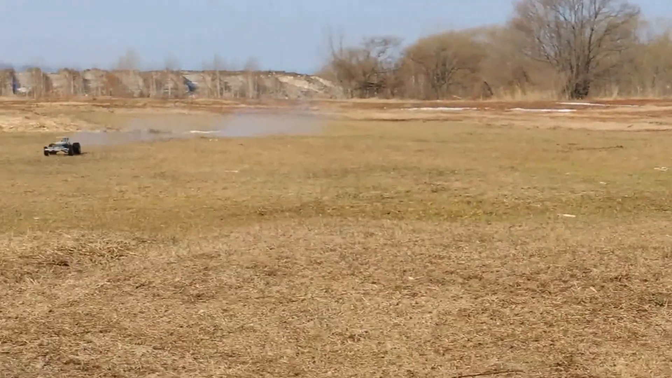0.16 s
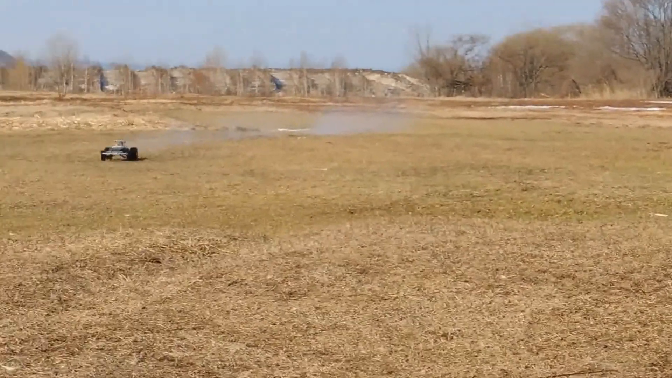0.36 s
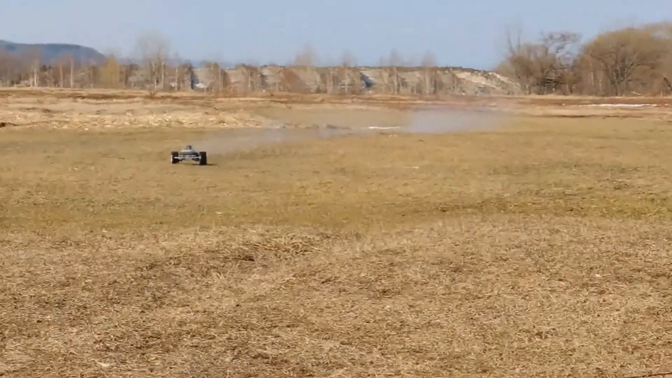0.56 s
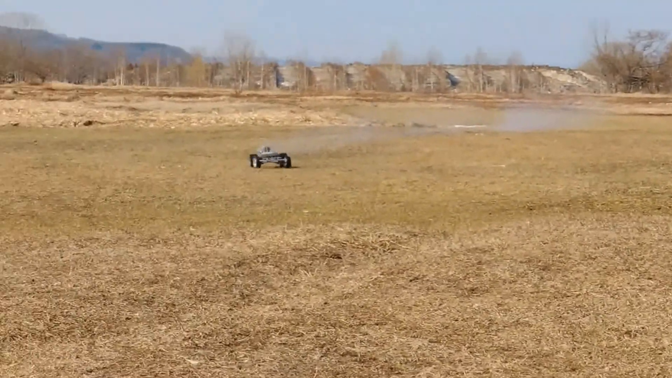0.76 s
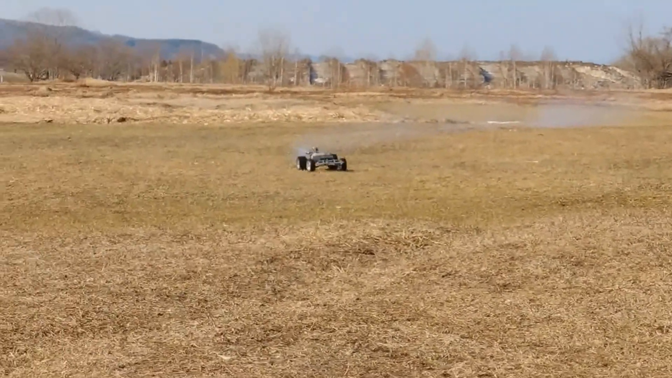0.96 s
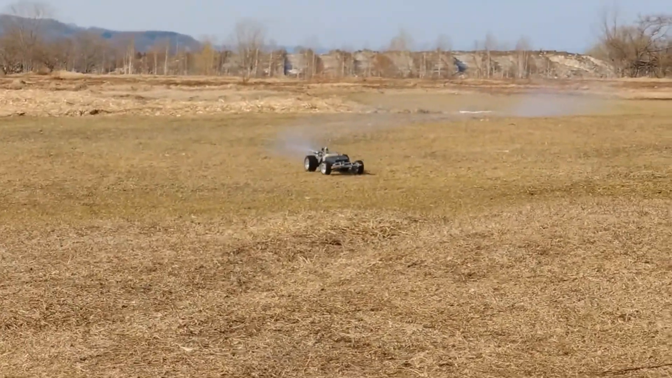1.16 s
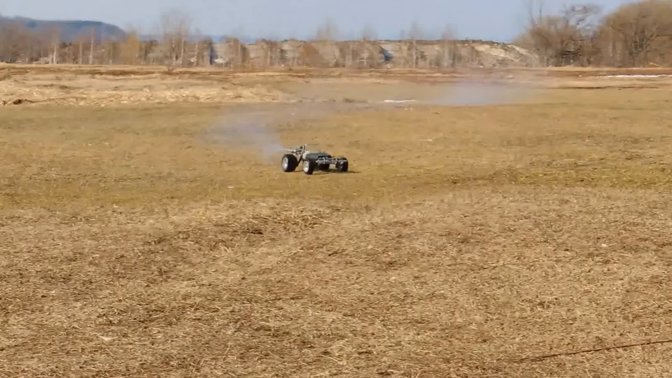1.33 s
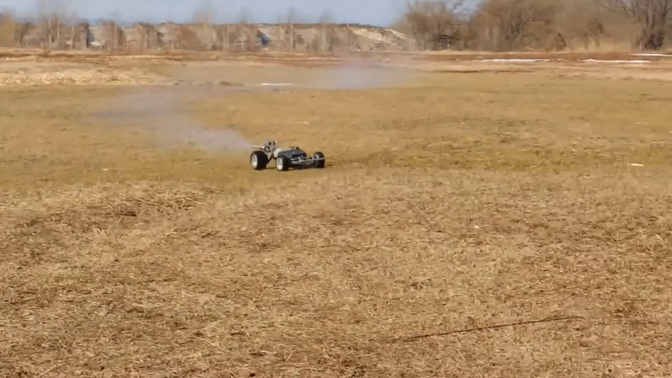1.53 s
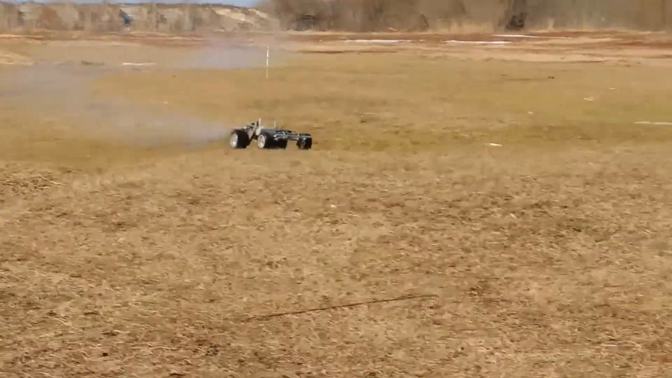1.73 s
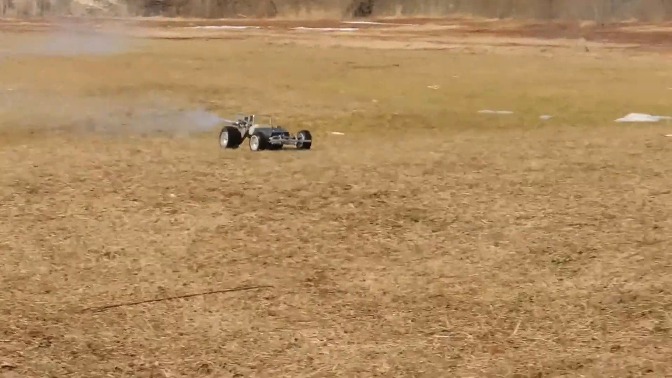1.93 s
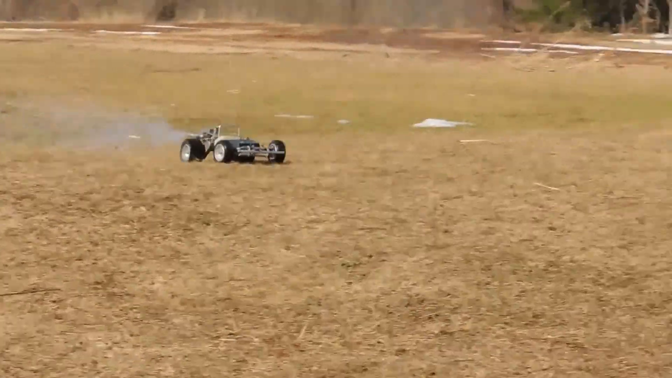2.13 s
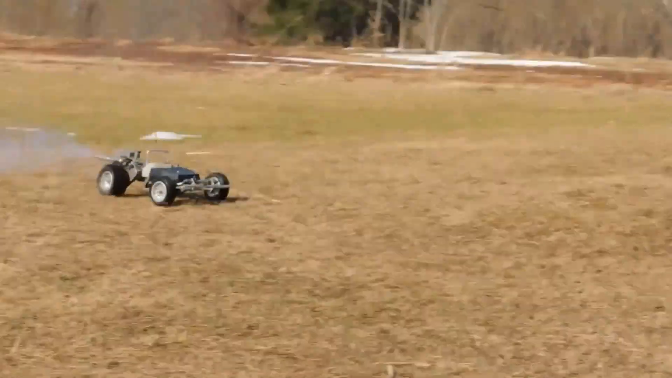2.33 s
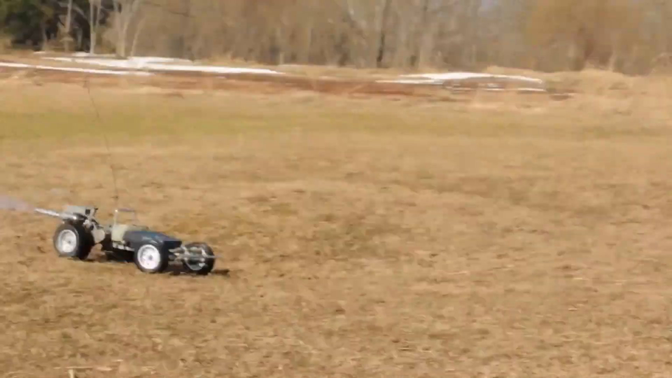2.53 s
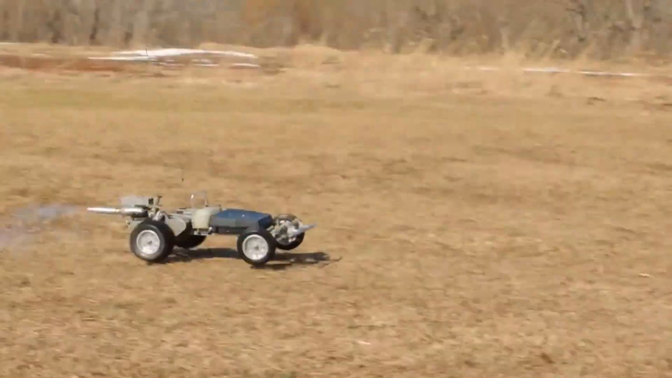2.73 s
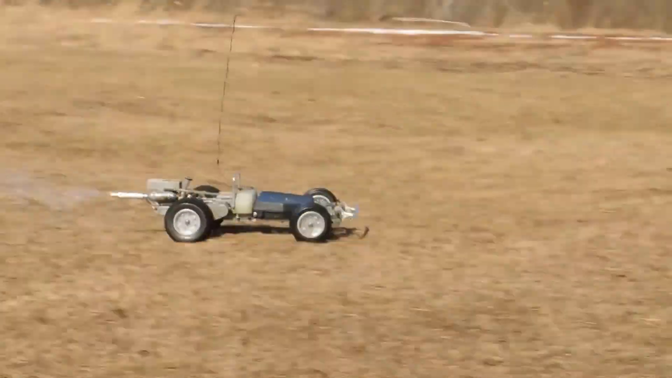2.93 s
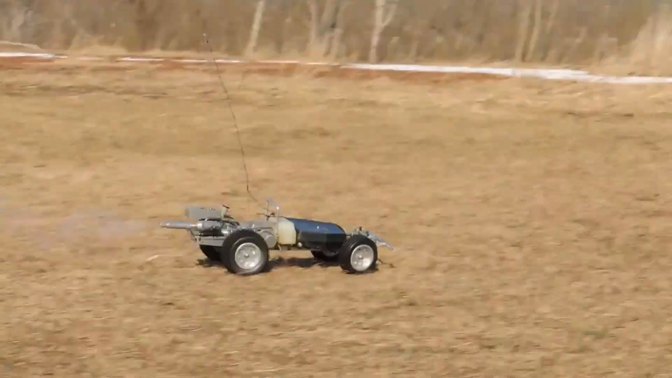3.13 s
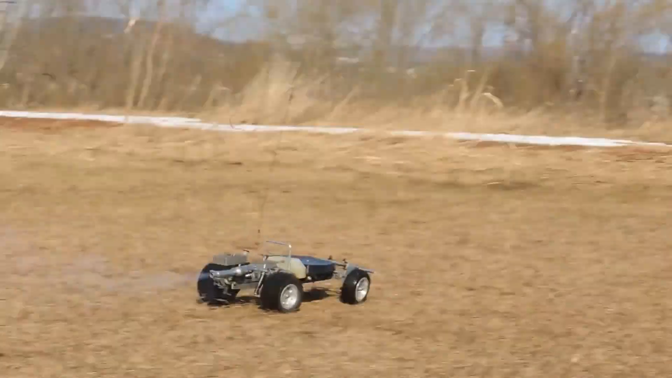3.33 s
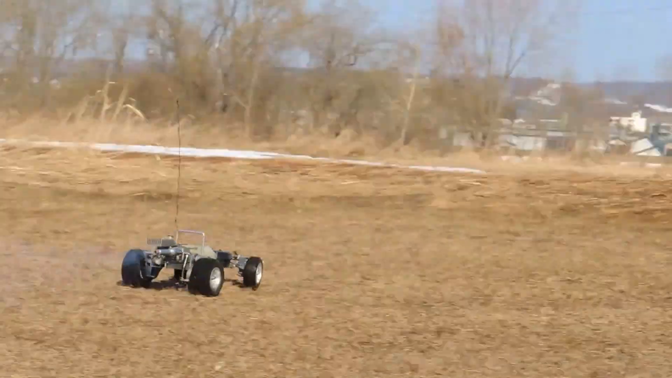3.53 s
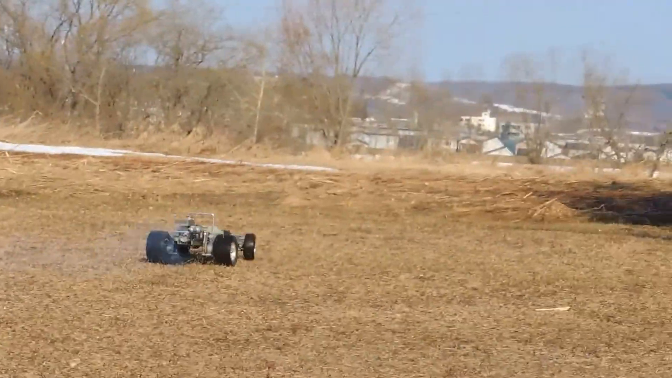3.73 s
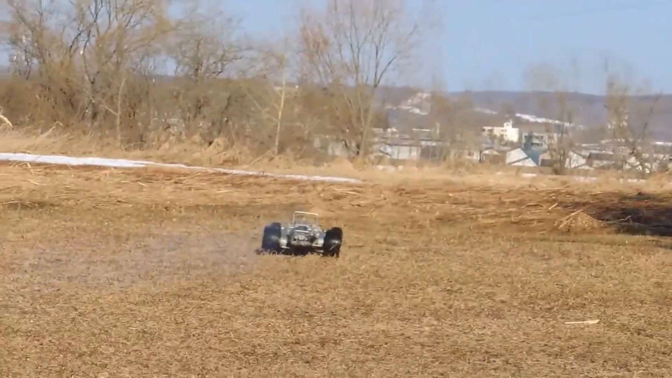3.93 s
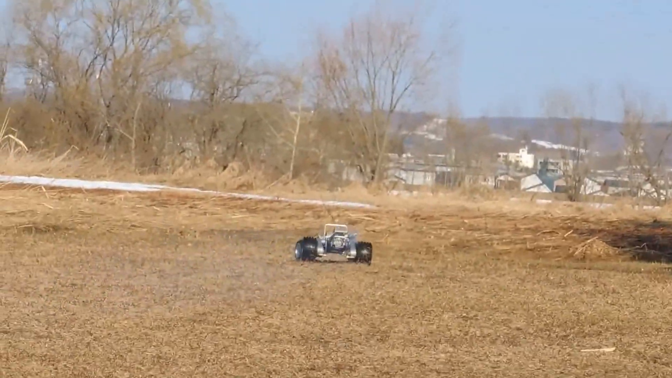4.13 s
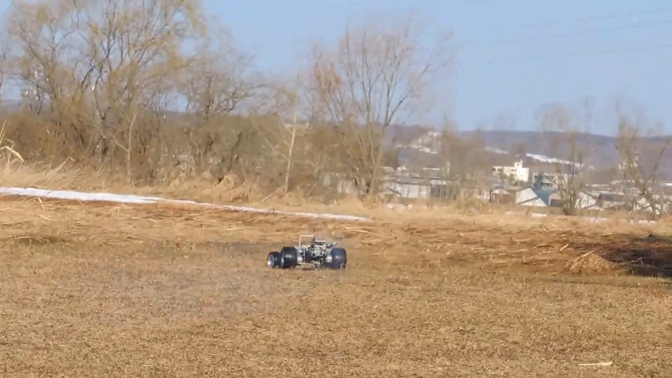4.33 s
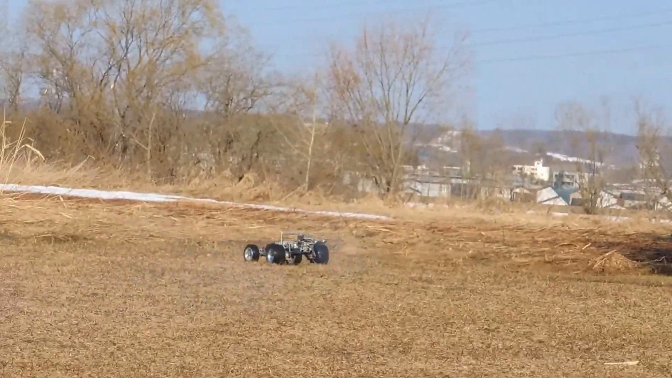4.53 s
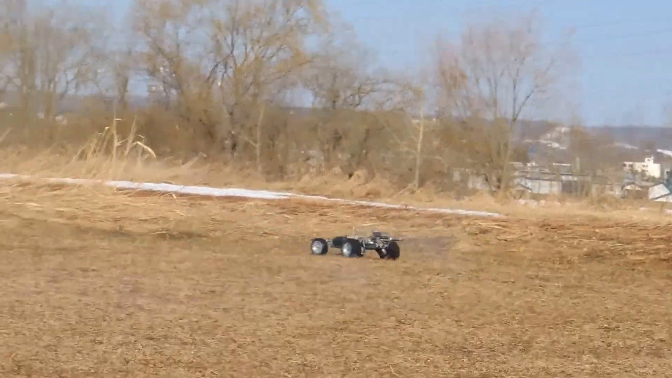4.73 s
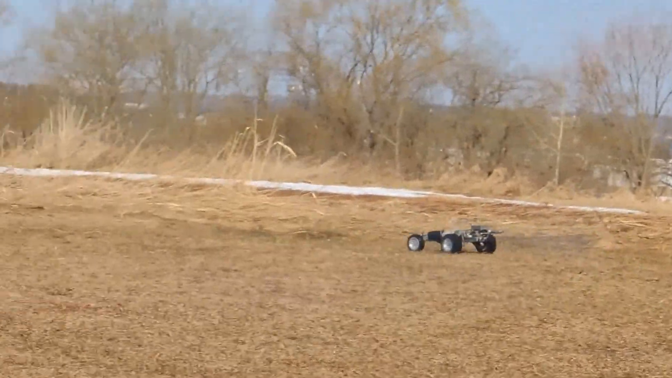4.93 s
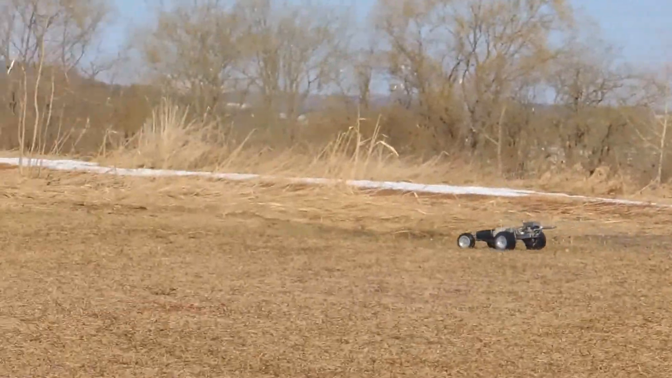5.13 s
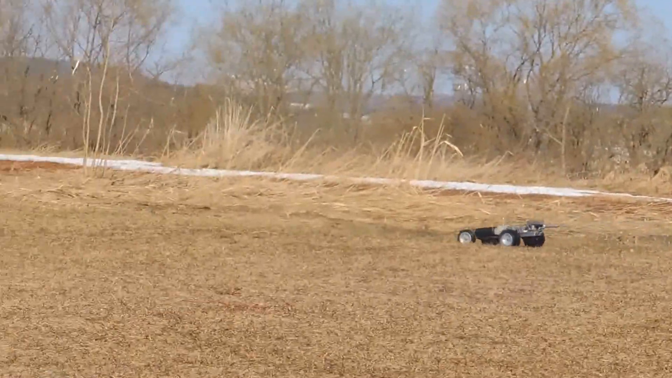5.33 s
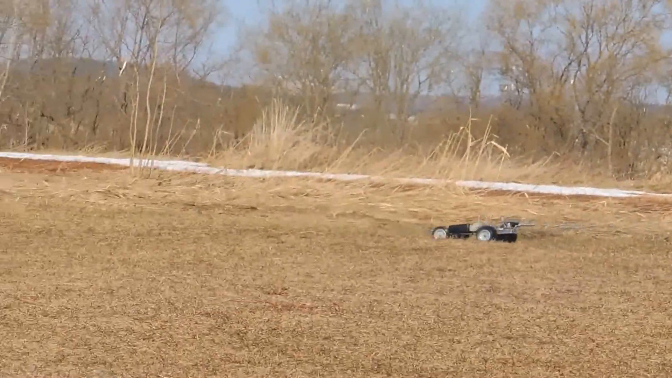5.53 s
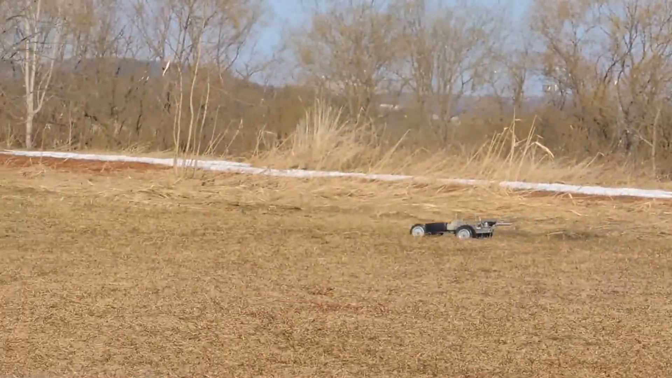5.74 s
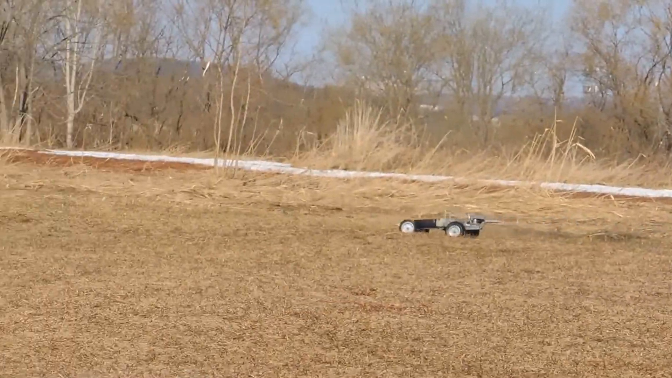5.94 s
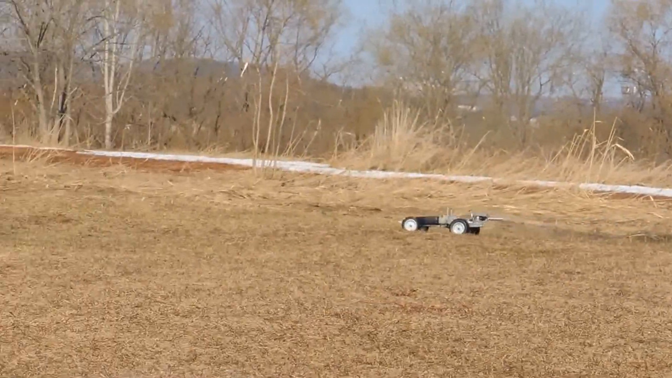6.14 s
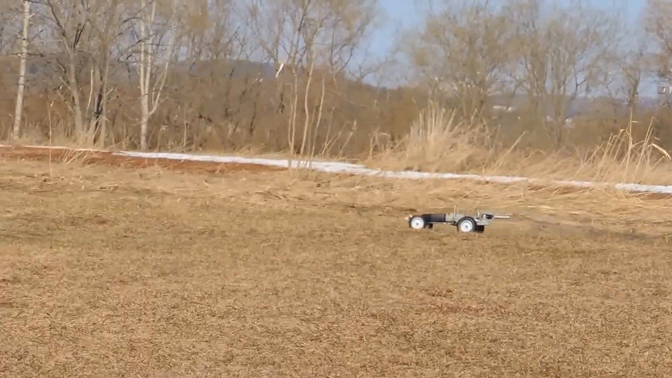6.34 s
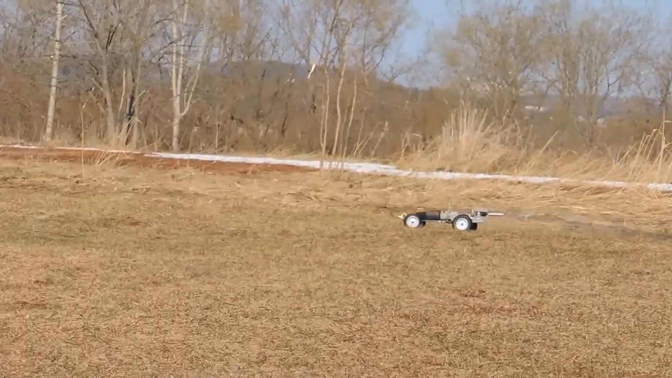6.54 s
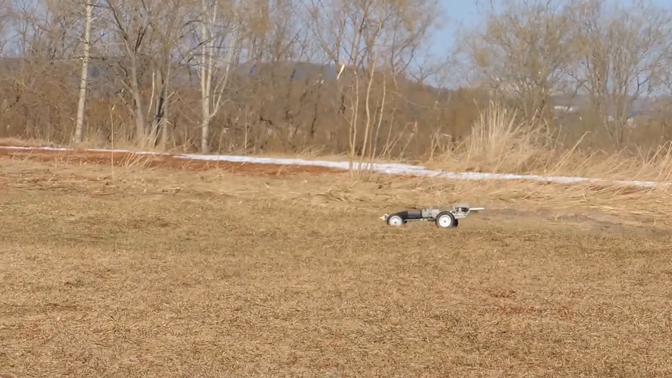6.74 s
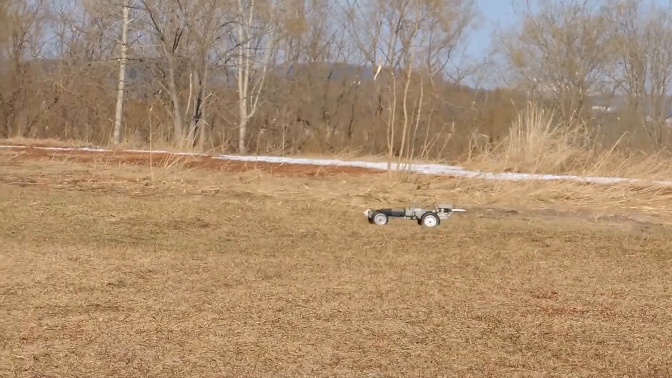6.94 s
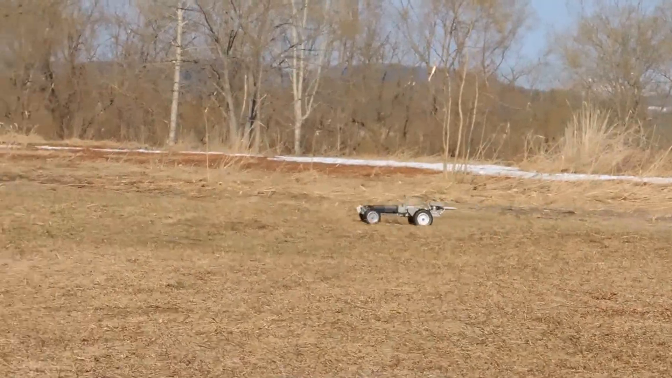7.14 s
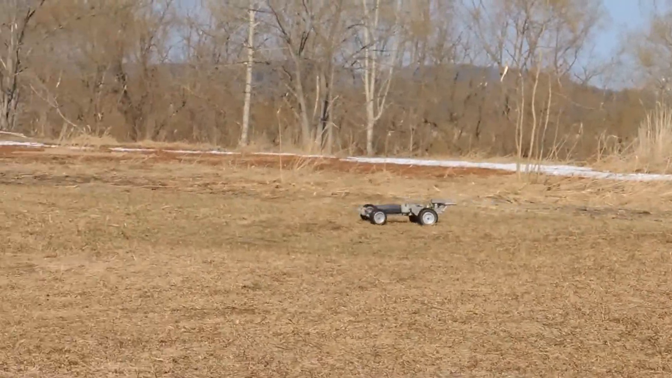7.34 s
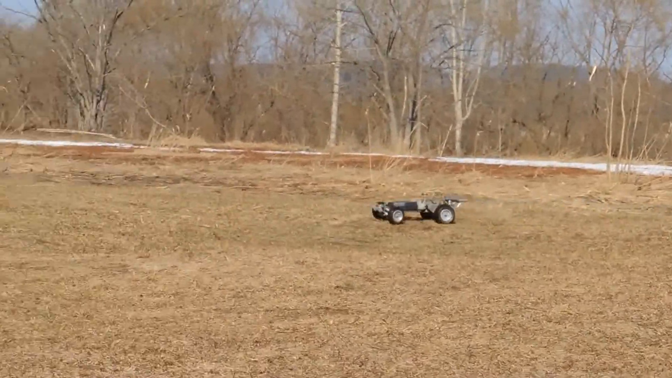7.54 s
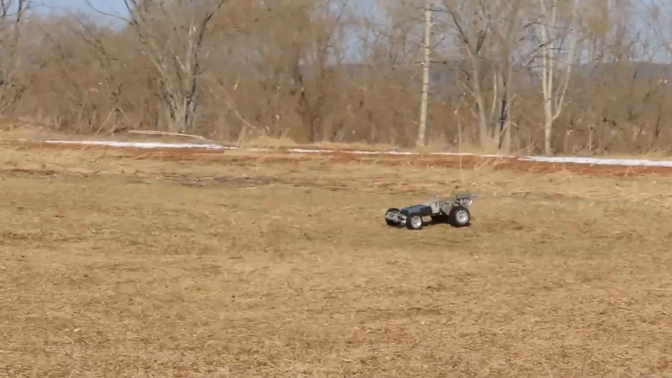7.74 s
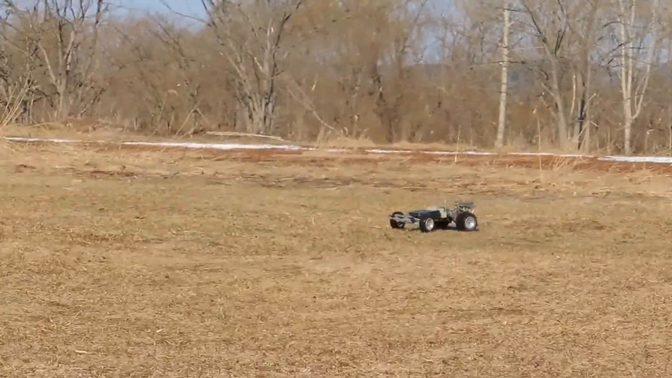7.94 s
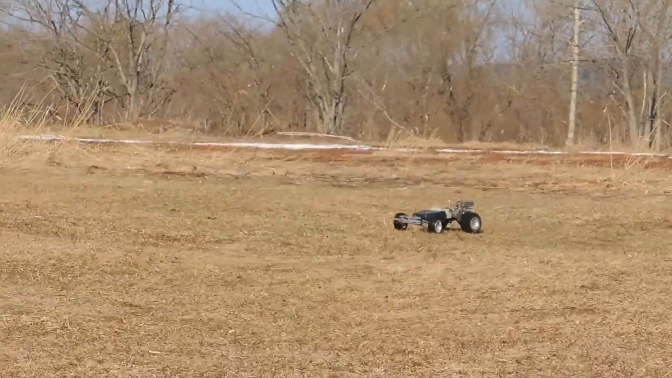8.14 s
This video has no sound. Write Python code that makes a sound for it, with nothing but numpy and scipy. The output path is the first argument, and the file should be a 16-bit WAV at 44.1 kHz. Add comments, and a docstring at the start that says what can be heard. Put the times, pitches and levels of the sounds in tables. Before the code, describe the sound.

The high, nasal buzz of a small model car engine surges, passes close by and sinks to a lower, rattling putter outdoors.

```python
"""A model buggy's small two-stroke engine drives past over dry grass, turns and trundles off.
Every turn of the crank pumps a puff through the exhaust; a firing adds a sharp crack that rings
the pipe. With too much fuel in the mix, it often fires weakly on every other turn. Over each
bump the revs climb, then snap back. Gas hiss, gear rattle and a light wind lie under it,
and the ground adds a dull echo of the buggy."""
import sys
import numpy as np
from scipy import signal
from scipy.fft import rfft, irfft
from scipy.io import wavfile
from scipy.ndimage import uniform_filter1d

SR = 44100
rng = np.random.default_rng(int(sys.argv[2]) if len(sys.argv) > 2 else 0)


def int16_out(signal):
    """Quantize to a 16-bit WAV file."""
    q = np.round(np.clip(np.atleast_2d(signal).T, -1, 1) * 32767)
    wavfile.write(sys.argv[1], SR, q.astype(np.int16))


N = 360738
TIME, FREQS = np.arange(N) / SR, np.fft.rfftfreq(N, 1 / SR)


def gain(db):
    return 10 ** (np.asarray(db) / 20)


def evened(x, size=3000):
    """Holds the average strength (rms) at 1, judged over `size` samples."""
    return x / np.sqrt(abs(uniform_filter1d(uniform_filter1d(x ** 2, size), size)) + 1e-20)


def wander(seconds):
    """A slow random drift of strength 1."""
    size = round(seconds * SR)
    return evened(uniform_filter1d(uniform_filter1d(rng.standard_normal(N), size), size), N)


def curve(rows, column=1):
    return np.interp(TIME, [r[0] for r in rows], [r[column] for r in rows])


def spectrum(rows):
    hz, value = np.transpose(rows)
    return np.interp(np.log(FREQS + 1), np.log(hz + 1), value)


def coloured(x, rows):
    return irfft(rfft(x) * gain(spectrum(rows)), N)


def filtered(x, hz, kind, order=2):
    return signal.sosfilt(signal.butter(order, hz, kind, fs=SR, output="sos"), x)


def fading(x, seconds):
    return signal.lfilter([1], [1, -np.exp(-1 / (seconds * SR))], x)


def resonate(x, hz, width):
    """Lets a sound ring at one pitch, which may slide."""
    turn = np.exp(2j * np.pi * np.cumsum(hz * np.ones(N)) / SR)
    decay = np.exp(-np.pi * width / SR)
    return 2 * (turn * signal.lfilter([1 - decay], [1, -decay], x / turn + 1e-18)).real


def ringing(x, hz, width):
    """Resonating twice makes a tone swell before it dies."""
    return resonate(resonate(x, hz, width), hz, width)


# Tone of the wind: f/Hz, level/dB
WIND_TONE = [(12, -34), (20, 1), (130, -7.5), (170, -8), (290, -120)]


def wind():
    """Light wind makes a low, lumpy rumble."""
    loudness = gain(-55.5 + 2.5 * wander(.2))
    middle, side = (evened(coloured(rng.standard_normal(N), WIND_TONE), N) for _ in range(2))
    return loudness * np.array([middle + .4 * side, middle - .4 * side])


# How alike the hiss is on both sides: f/Hz, likeness/0-1
LIKENESS = [(60, 1), (150, .62), (380, .8), (950, .7), (2370, .6), (4300, .2), (5950, .45), (9000, .45),
            (14900, .5)]
# How far the left side is ahead: f/Hz, phase/rad
LEFT_LEAD = [(0, 0), (2000, .1), (4000, .7), (6000, .3), (8000, .5), (10000, 1.6), (14000, 1.3)]
# Left compared with right: f/Hz, level/dB
LEFT_LEVEL = [(60, -0.5), (110, -1.0), (200, -1.5), (380, -1.0), (700, -1.0), (1290, -0.5), (2370, -1.0),
              (4380, 0.0), (8080, -3.0), (14900, -0.5)]


def stereo(shared, stray):
    """Sound reaches left and right a little differently; they share only part of the hiss."""
    tilt = gain(spectrum(LEFT_LEVEL) / 2) * np.exp(.5j * spectrum(LEFT_LEAD))
    side = np.sqrt(1 - np.clip(spectrum(LIKENESS), 0, 1)) * rfft(stray)
    return irfft([(rfft(shared) + side) * tilt, (rfft(shared) - side) / tilt], N)


# Tone as the buggy turns: t/s, ring pitch/Hz, boom/dB, ring overtones/dB, hiss treble/dB,
# ground echo/0-1, nasal tone/dB, hollow tone/dB
FACING = [(0, 4500, 1, -29, -42.5, 0.43, 18, 30), (.6, 4520, 5.5, -13, -43, 0.53, 15, 9),
          (.8, 4520, 4, -8, -31, 0.62, 6, 17), (1.02, 4500, 0.5, -18, -31, 0.74, -7, 12),
          (1.2, 4566, 3.5, 0, -21, 0.6, 10, 16), (1.55, 4400, 6, -5, -22.5, 0.5, 6, 13),
          (1.9, 4445, 1, -4, -18, 0.24, 16, 16), (2.3, 4480, -14, 2.5, -16, 0.42, 13, 4),
          (2.6, 4393, 13, 6, -17, 0.07, 5, -9), (2.85, 4395, 18, 5.5, -19.5, 0.1, 13, -3),
          (3, 4445, 9, -10, -17.5, 0.14, 15, -3), (3.3, 4451, 8, 0.5, -17, 0.12, 16.5, 16.5),
          (3.8, 4343, 0.5, 2, -15, 0.47, 15.5, 10.5), (4.3, 4350, -5, 0, -19, 0.73, 10.5, 6),
          (4.6, 4180, -16, -39, -25, 0.75, 15, 9), (5, 4195, -12.5, -21, -27, 0.84, 5.5, 7.5),
          (5.6, 4158, -15, -20, -26, 0.9, 11.5, 11.5), (6.3, 4340, -8, -21, -16, 0.86, 13.5, 6.5),
          (7, 4375, -8, -19, -15, 0.72, 16.5, 7), (7.6, 4331, -8, -18, -23.5, 0.78, 15.5, 17.5),
          (8.18, 4162, -3.5, -12, -20.5, 0.72, 12, 11)]


def facing(name):
    """The tone changes with the way the buggy points."""
    columns = ["t", "ring_hz", "boom", "overtones", "treble", "echo", "nasal", "hollow"]
    return curve(FACING, columns.index(name))


def with_ground_echo(x):
    """A dull copy bounces off the ground half a wave late and cancels part of the treble."""
    dip_hz = 2750 + 850 * np.exp(-TIME / 3.9)
    late = np.interp(np.arange(N) - SR / (2 * dip_hz) + 2, np.arange(N), x)
    return x + np.clip(facing("echo"), 0, 1) * uniform_filter1d(late, size=5, origin=2)


# Bumps: peak t/s, climb/s, extra revs/Hz, flare at the peak, lull after it (negative is quieter)
BUMPS = [(0.11, 0.07, 20, 0, 0), (.48, 0.048, 3, 0, 0), (0.791, 0.067, 2.83, 0, 0),
         (0.957, 0.03, 5.3, 0, 0), (1.191, 0.065, 1.97, 0.5, 0), (1.331, 0.053, 16.4, 0.5, 0),
         (1.419, 0.048, 18, 1, 0), (1.57, 0.066, 22, 0.5, 0), (1.679, 0.06, 31.7, 1, 0),
         (1.78, 0.048, 18.4, 0.5, 0), (1.888, 0.048, 13.8, 1, 0), (2.09, 0.19, 21.8, 2.5, 0.5),
         (2.169, 0.042, 9.7, 1, 0.5), (2.275, 0.11, 16.9, 1.5, 0.5), (2.349, 0.028, 6.3, -0.5, 0.5),
         (2.49, 0.13, 20.2, -0.5, 0), (2.711, 0.048, 7, -0.5, 0), (2.789, 0.044, 5.45, 0, 0),
         (2.92, 0.036, 1.8, 0.5, 0), (3.05, .16, 20.6, 0, -0.5), (3.17, 0.043, 2.32, 0, 0),
         (3.25, 0.13, 22.3, 1, 0), (3.4, 0.084, 20.5, 1, 0), (3.48, .04, 3, 0, 0), (3.575, .05, 6, 0, 0),
         (3.667, 0.036, 3.98, 0.5, 0), (3.77, 0.085, 15.7, 1, 0), (3.851, 0.031, 2, 0, 0),
         (3.95, 0.082, 19.6, 1, 0), (4.09, 0.09, 17, 2, 0), (4.25, 0.049, 3.06, -0.5, -0.5),
         (5.29, 0.063, 3, 0.5, 0), (5.42, 0.069, 2.1, 0, 0), (5.53, 0.049, 4.1, 0, 0),
         (5.7, 0.043, 2, 0, 0), (5.8, .03, 1.43, 0, 0), (5.89, 0.051, 2.3, 0, 0), (6.09, 0.083, 2.2, 0, 0),
         (6.29, 0.071, 1.53, .5, 0), (6.49, 0.1, 4.25, 0.5, 0), (6.651, .12, 3.34, 0, 0),
         (6.801, .11, 5.14, 0.5, 0), (6.92, 0.085, 3.26, 0, 0), (7.02, 0.049, 2.63, 0, 0),
         (7.301, 0.16, 5.2, 0.5, 0), (7.451, 0.1, 2.93, 0.5, 0), (7.6, 0.057, 6.4, 0, 0),
         (7.73, .1, 5.24, 0.5, 0), (7.848, 0.063, 3.4, 0, -0.5), (8.129, 0.037, 0.86, 1, 0)]


def bumps(bite_s=.045, lull_s=.083):
    """A bump takes the load off the wheels: the revs climb, then drop as the tyres bite."""
    extra_hz, flare, lull = np.zeros((3, N))
    for peak_s, climb_s, rise_hz, at_peak, after in BUMPS:
        ramp = np.interp(TIME, [peak_s - climb_s, peak_s, peak_s + bite_s], [0, 1, 0])
        extra_hz += rise_hz * ramp
        flare += at_peak * ramp
        lull += after * np.clip(1 - abs(TIME - peak_s - bite_s) / lull_s, 0, 1)
    return extra_hz, flare, lull


# Levels before mixing as the buggy passes: t/s, puff/dB, crack/dB, ring/dB, hiss/dB
DRIVE_BY = [(0, -37.5, -43.5, -53.5, -34.5), (.2, -39.5, -44, -56, -32.5), (.57, -42, -42, -46.5, -31),
            (.8, -44.5, -44, -50, -32), (.95, -40, -43.5, -52.5, -32.5), (1.3, -42, -40.5, -42.5, -31.5),
            (1.65, -33.5, -35, -47, -26.5), (2.03, -32.5, -32, -44, -31.5), (2.25, -33, -34.5, -40, -30),
            (2.42, -31, -32, -31, -19.5), (2.5, -27.5, -30.5, -23.5, -15), (2.55, -29.5, -31.5, -34, -21.5),
            (2.61, -30.5, -29.5, -24.5, -17.5), (2.72, -33, -27.5, -32.5, -17),
            (2.88, -29.5, -26, -28.5, -18.5), (2.93, -31, -26, -23.5, -20),
            (3.01, -28.5, -25.5, -19.5, -15), (3.11, -27.5, -24, -21, -14.5), (3.21, -29, -25, -25.5, -21),
            (3.35, -30.5, -27, -24.5, -21.5), (3.55, -31, -27.5, -26.5, -20.5),
            (3.75, -32, -29, -26.5, -22.5), (4.1, -36, -32, -37, -31), (4.25, -37, -30.5, -28.5, -19.5),
            (4.45, -38, -31.5, -36, -27), (4.7, -39, -35, -42, -27.5), (5.1, -38, -34.5, -39.5, -24.5),
            (5.65, -40.5, -37, -54, -28), (6.24, -42.5, -34.5, -43.5, -26.5),
            (6.81, -43.5, -33.5, -40.5, -25.5), (7.1, -41.5, -34.5, -45, -25), (7.4, -41, -36.5, -47, -28),
            (7.7, -42, -41, -56, -28.5), (7.9, -43.5, -38.5, -44, -25), (8.18, -43.5, -42, -60, -29.5)]
# For those four layers, the change per unit of flare: level/dB
FLARE_DB = [0.82, 0.047, 2.8, 3.7]
# The same per unit of lull: level/dB
LULL_DB = [3.8, 5.4, 6.8, 7.9]


def loudness_of(layer):
    """Each layer swells as the buggy passes and wobbles at the bumps."""
    k = ["puff", "crack", "ring", "hiss"].index(layer)
    _, flare, lull = bumps()
    return gain(curve(DRIVE_BY, k + 1) + FLARE_DB[k] * flare + LULL_DB[k] * lull)


# Tone of the hiss: f/Hz, relative level/dB
HISS_TONE = [(90, -31), (250, -15), (700, -19), (1500, -17), (2500, -17), (3600, -16), (4300, -14),
             (5200, -16), (6300, -16), (7900, -11), (9500, -4), (12000, -4), (14200, -6)]
# Gaps in the hiss between the pipe's tones: f/Hz, width/Hz
HISS_GAPS = [(5500, 2370), (7900, 2100)]
# How much each gap takes out: t/s, first/0-1, second/0-1
GAP_DEPTH = [(0, .3, .7), (.9, .4, .7), (1.5, 0.21, 0.46), (2.2, 0, .1), (3, 0, 0), (4, 0.28, 0),
             (4.8, .6, 0.31), (5.6, 0.68, 0.3), (6.6, 0.26, .2), (7.6, .7, .3), (8.18, 0.61, 0.36)]


def hiss(gust):
    """Intake, gears and grass: two rushing noises, pulsed by gas bursts and loose rattles."""
    ticks = rng.random(N) < 90 / SR  # about 90 a second
    rattles = fading(ticks * gain(.44 * np.minimum(rng.exponential(1, N), 3)), seconds=.0003)
    throb = evened(1 + .55 * gust + 1.3 * rattles)
    rush = np.array([coloured(throb * rng.standard_normal(N), HISS_TONE) for _ in range(2)])
    rush /= rush.std()
    lows = signal.sosfiltfilt(signal.butter(2, 6500, fs=SR, output="sos"), rush)
    # distance and the buggy's body dull the treble
    rush = lows + gain(facing("treble") + 1.4 * wander(.044)) * (rush - lows)
    for k, gap in enumerate(HISS_GAPS):
        depth = np.clip(curve(GAP_DEPTH, k + 1), 0, 1)
        rush = [x - depth * resonate(x, *gap) for x in rush]
    return loudness_of("hiss") * np.array(rush)


# The muffler's hum, then its deeper boom: f/Hz, width/Hz
MUFFLER_TONES = [(247, 105), (130, 256)]


def muffler_puff(pumps):
    """Each push of gas sets the air in the muffler swinging."""
    surge = filtered(np.roll(pumps, 22), 420, "low")  # smooth and slightly late
    hum, boom = (resonate(surge, hz, width) for hz, width in MUFFLER_TONES)
    hum, boom = evened(filtered(hum, 150, "high")), evened(filtered(boom, 70, "high"))
    return loudness_of("puff") * evened(hum + gain(facing("boom")) * boom)


# Two main tail pipe tones and an overtone: multiple of ring pitch, width/Hz, level/dB
RING_TONES = [(.983, 340, 0), (1.024, 340, 0), (1.21, 300, -11)]
# Pitch of the pipe's sizzle: t/s, f/Hz
SIZZLE_PITCH = [(0, 9200), (.8, 9300), (1.25, 9200), (1.7, 9250), (2.3, 8950), (3.4, 8853), (4.3, 8800),
                (5.2, 8703), (8.18, 8998)]
# Tones of the sizzle: multiple of its pitch, width/Hz, level/dB
SIZZLE_TONES = [(0.739, 654, -13.5), (1, 550, -6.5), (1.115, 550, -15.5)]
# The highest tones: f/Hz, width/Hz, level/dB
TOP_TONES = [(11507, 430, -8.5), (12260, 1700, -14)]
# They come through as the pipe points back at us: t/s, level/dB
TOP_LEVEL = [(0, -13), (2, -16), (3.6, -18), (4.2, -1), (4.7, 5), (5.3, 1), (6.1, 0), (7, -8), (7.7, 0),
             (8.18, 8)]


def tail_pipe_ring(blasts, jet):
    """Blasts and jet noise make the tail pipe ring high and bright."""
    blow = .08 * jet[1] + .12 * rng.standard_normal(N) - np.roll(blasts, -4)
    low, high, overtones = (gain(db) * ringing(blow, ratio * facing("ring_hz"), width)
                            for ratio, width, db in RING_TONES)
    for ratio, width, db in SIZZLE_TONES:
        overtones += gain(db + 3 * wander(.047)) * ringing(blow, ratio * curve(SIZZLE_PITCH), width)
    ring = low + high + gain(facing("overtones")) * overtones
    for hz, width, db in TOP_TONES:
        rough_blow = blow + .27 * jet[0] + .33 * rng.standard_normal(N)
        ring += gain(db + curve(TOP_LEVEL)) * ringing(rough_blow, hz, width)
    return loudness_of("ring") * evened(ring)


# Steady pipe tones: f/Hz, width/Hz, level/dB
PIPE_TONES = [(525, 330, 2.5), (1015, 1300, 1), (1187, 170, 3.5), (1680, 150, -28), (2600, 850, -34)]
# A nasal tone that slides as the pipe turns: t/s, f/Hz
NASAL_PITCH = [(0, 1470), (.12, 1580), (.55, 1606), (.8, 1350), (1.25, 1440), (1.7, 1481), (1.95, 1478),
               (2.35, 1570), (2.7, 1500), (2.88, 1502), (3.03, 1680), (3.12, 1482), (3.25, 1650),
               (3.3, 1440), (3.55, 1401), (3.75, 1521), (3.9, 1472), (4.5, 1445), (5.1, 1256), (5.6, 1351),
               (6.5, 1514), (6.9, 1415), (7.5, 1478), (8.18, 1340)]
# Two low tones that slide too: t/s, hollow f/Hz, chesty f/Hz, chesty level/dB
LOW_TONES = [(0, 760, 530, 9), (.6, 800, 510, 17), (.85, 860, 457, 14), (1.3, 860, 453, 13),
             (1.7, 790, 499, 6), (2.3, 771, 520, -8), (2.7, 640.4, 479.4, -7), (3.1, 639.6, 430.4, -2),
             (3.8, 650.3, 406.8, 8), (4.4, 640.3, 400.4, -9), (5.5, 640, 380, -10), (6.5, 699.2, 374.6, -8),
             (8.18, 660, 369.5, -13)]
# The sharp front of each firing: t/s, relative level/dB
SNAP_LEVEL = [(0, -10), (1.5, -6), (2.3, -1), (3.4, -1), (4.3, -6), (5, -12), (8.18, -12)]


def pipe_crack(blasts, jet):
    """Each blast is a short dip in pressure that knocks the air in the pipe."""
    dip = -blasts + .035 * jet[0]
    crack = sum(gain(db) * resonate(dip, hz, width) for hz, width, db in PIPE_TONES)
    crack += gain(facing("nasal") + 1.7 * wander(.052)) * resonate(dip, curve(NASAL_PITCH), 160)
    crack += gain(facing("hollow")) * resonate(dip, curve(LOW_TONES), 217)
    crack += gain(curve(LOW_TONES, 3)) * resonate(dip, curve(LOW_TONES, 2), 150)
    snap = gain(curve(SNAP_LEVEL)) * filtered(-np.roll(blasts, 2), [400, 7000], "band", order=1)
    return loudness_of("crack") * evened(filtered(crack, [200, 3600], "band") + snap)


# Turns of the crank per second, under load: t/s, f/Hz
CRANK_SPEED = [(0, 184.7), (.18, 182.4), (.42, 176.9), (.66, 158.1), (.79, 155.1), (.92, 146.8),
               (1.09, 144.4), (1.26, 151.7), (1.37, 145.2), (1.48, 157.8), (1.61, 166.4), (1.93, 174.8),
               (2.54, 175.6), (2.63, 180), (2.75, 157.8), (2.87, 151), (3.1, 140.5), (3.5, 137.5),
               (3.63, 129.6), (3.82, 126.6), (4.0, 115.9), (4.14, 113.6), (4.26, 123.4), (4.4, 97),
               (4.52, 82.36), (4.6, 81.95), (4.7, 78.45), (4.8, 84.2), (4.9, 87.6), (4.95, 87.1),
               (5.12, 93.14), (5.24, 87.3), (5.59, 78.9), (5.66, 84.7), (5.77, 86.5), (6.01, 91.1),
               (6.14, 93), (6.4, 94), (6.53, 94.46), (6.84, 92.45), (6.97, 88.76), (7.34, 85), (7.54, 81.4),
               (7.63, 73.9), (7.89, 68.6), (7.96, 75.2), (8.18, 74.5)]
# How far a weak firing typically falls below a full one: t/s, drop/dB
MISFIRE_DROP = [(0, 0), (.02, 2), (.03, 9), (.05, 4), (.085, 5), (.1, 9), (.135, 13), (.3, 12), (.315, 1),
                (.33, 4), (.35, 10), (.37, 5), (.39, 13), (.4, 1), (.45, 0), (.46, 7), (.48, 1), (.51, 8),
                (.53, 0), (.555, 10), (.57, 0), (.6, 9), (.63, 6), (.66, 2), (.7, 0), (1.66, 0),
                (1.695, 11), (1.72, 0), (1.78, 0), (1.8, 5), (1.82, 0), (1.87, 3), (1.89, 9), (1.91, 2),
                (1.95, 0), (2, 1), (2.01, 6), (2.04, 5), (2.07, 13), (2.1, 14), (2.105, 0), (2.125, 1),
                (2.14, 10), (2.155, 9), (2.165, 2), (2.2, 3), (2.23, 12), (2.27, 8), (2.305, 14),
                (2.325, 0), (2.34, 5), (2.37, 5), (2.38, 0), (2.39, 13), (2.44, 10), (2.5, 14), (2.53, 10),
                (2.54, 1), (2.56, 10), (2.62, 14), (2.635, 0), (2.655, 8), (2.705, 12), (2.735, 11),
                (2.745, 0), (2.76, 0), (2.77, 10), (2.81, 14), (2.82, 0), (2.85, 0), (2.857, 8), (2.865, 0),
                (2.957, 0), (2.958, 12), (2.965, 12), (2.966, 0), (3.051, 0), (3.052, 14), (3.059, 14),
                (3.06, 0), (7.6, 0), (7.7, 2), (7.95, 3), (8.18, 2)]


def crank():
    """Each turn gives one click for pumping and one for firing; no two are equally strong."""
    revs_hz = (curve(CRANK_SPEED) + bumps()[0]) * (1 + .0035 * wander(.03))  # wavers on rough grass
    turns = np.cumsum(revs_hz) / SR + .99
    starts = np.flatnonzero(np.diff(np.floor(turns)) > 0)
    strength, jitter, luck = rng.standard_normal((len(starts), 3)).T
    weak_db = curve(MISFIRE_DROP)[starts] * np.clip(1 + .2 * luck, 0, 2)
    for k in range(1, len(starts)):
        weak_db[k] *= weak_db[k - 1] < 1  # a weak turn leaves fresh fuel, so the next fires fully
    starts = np.clip(starts + np.round(.4 * jitter).astype(int), 0, N - 1)
    pumps, blasts = np.zeros((2, N))
    pumps[starts] = gain(.13 * strength - .1 * weak_db)
    blasts[starts] = gain(.6 * strength - weak_db)
    return pumps, evened(blasts)


# A weaker pop after each firing, clearest once the pipe points back: t/s, relative level/dB
AFTERPOP_LEVEL = [(0, -30), (4.2, -14), (4.6, -6), (5.5, -9.5), (6.5, -14), (7.2, -11.5), (8.18, -14)]


def engine(afterpop_s=.0082):
    """Gas leaves the exhaust as a puff, a crack and a ring; its bursts are returned too."""
    pumps, blasts = crank()
    gust = evened(fading(blasts, seconds=.002))
    blasts = blasts + gain(curve(AFTERPOP_LEVEL)) * np.roll(blasts, round(afterpop_s * SR))
    jet = (gust + .5) * rng.standard_normal((2, N))  # some flow never stops
    return muffler_puff(pumps) + pipe_crack(blasts, jet) + tail_pipe_ring(blasts, jet), gust


def scene():
    """The engine and its hiss echo off the ground, over the wind."""
    exhaust, gust = engine()
    rush, stray = hiss(gust)
    return stereo(with_ground_echo(exhaust + 1.63 * rush), with_ground_echo(stray)) + wind()


def record(dry):
    """Cuts the treble above 14150 Hz."""
    low_pass = signal.firwin(1023, 14150, window=("kaiser", 9), fs=SR)
    return signal.oaconvolve(dry, low_pass[None], "same")


dry = scene()
out = record(dry)
int16_out(out)
```